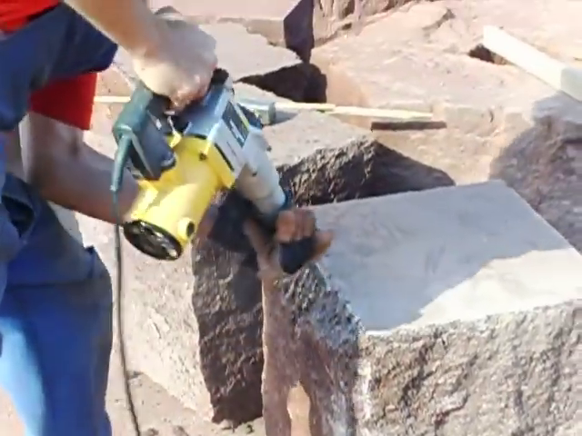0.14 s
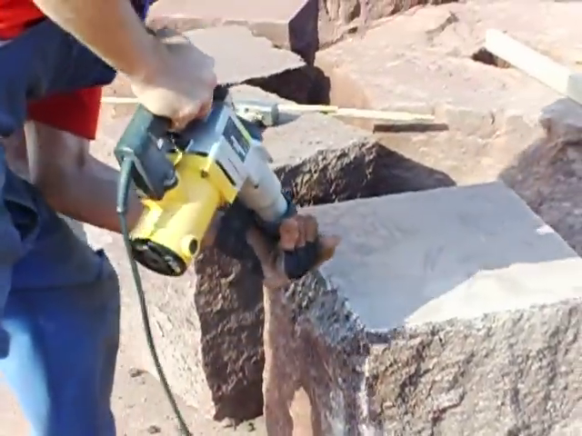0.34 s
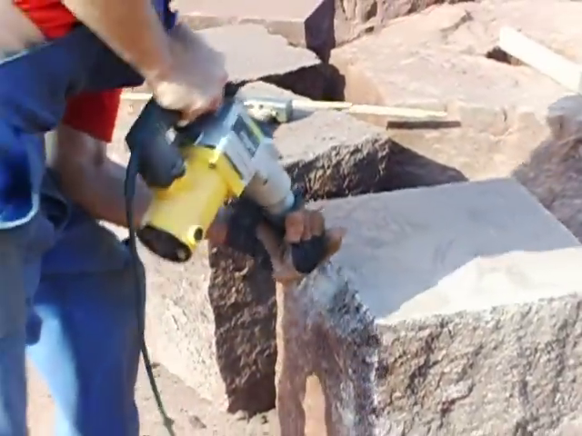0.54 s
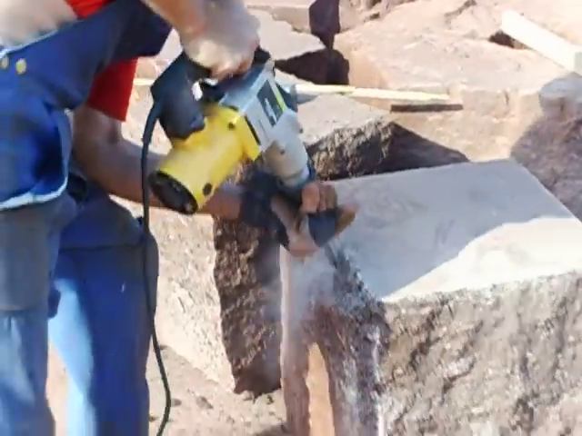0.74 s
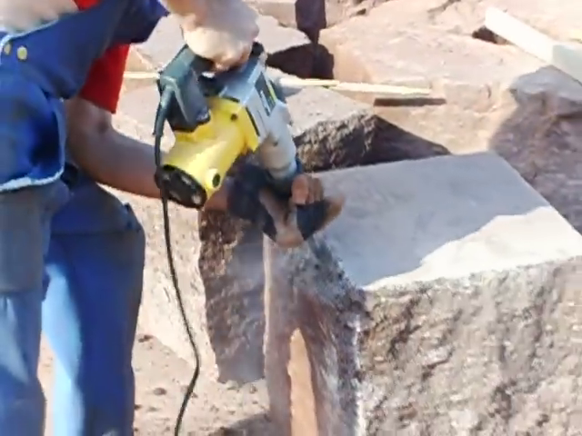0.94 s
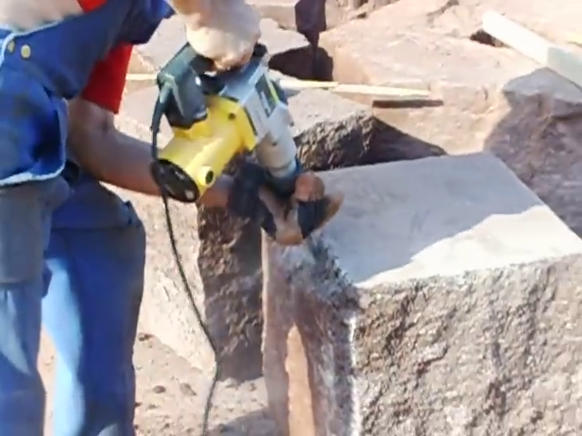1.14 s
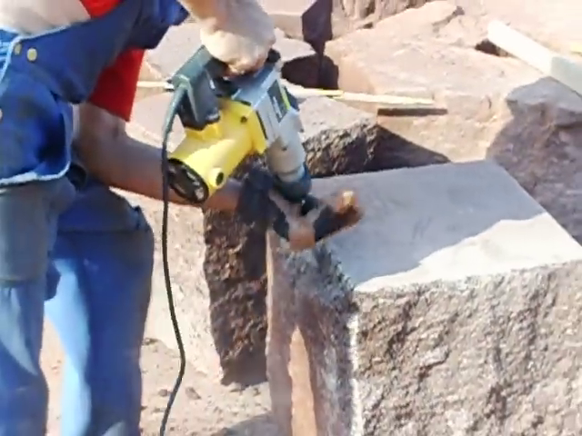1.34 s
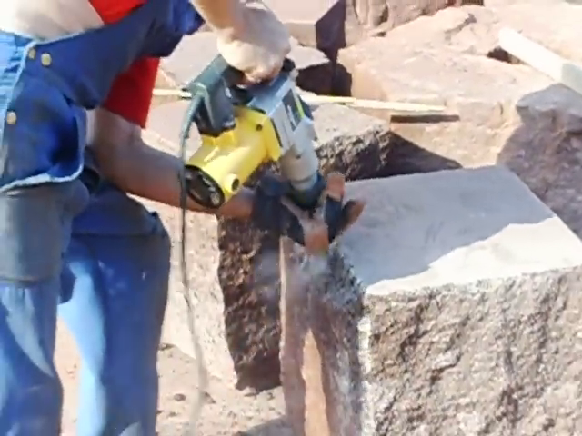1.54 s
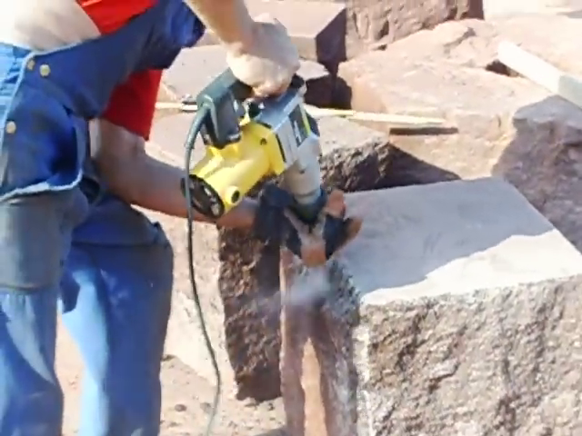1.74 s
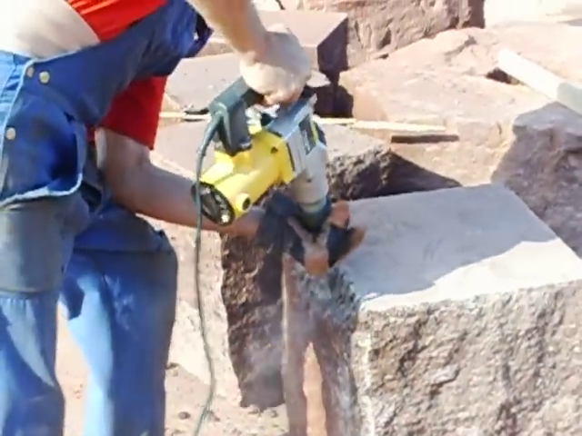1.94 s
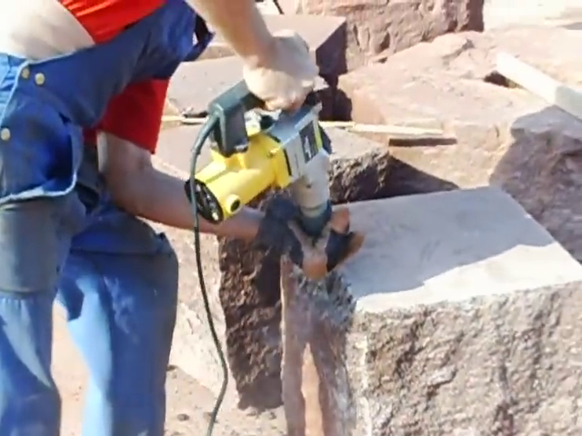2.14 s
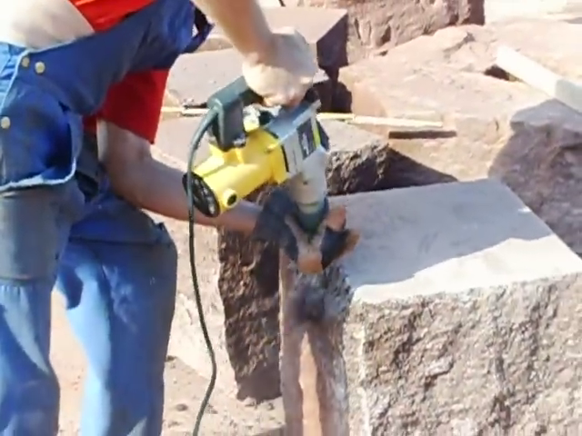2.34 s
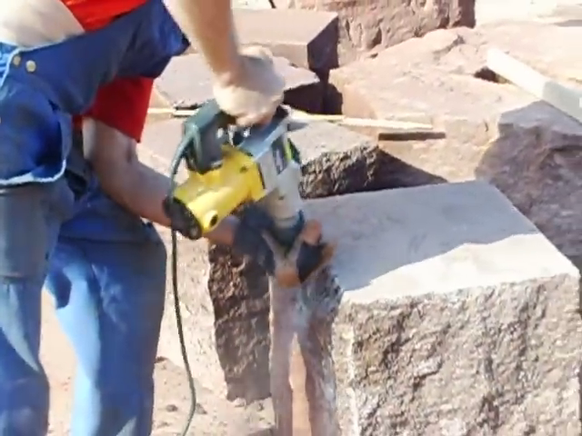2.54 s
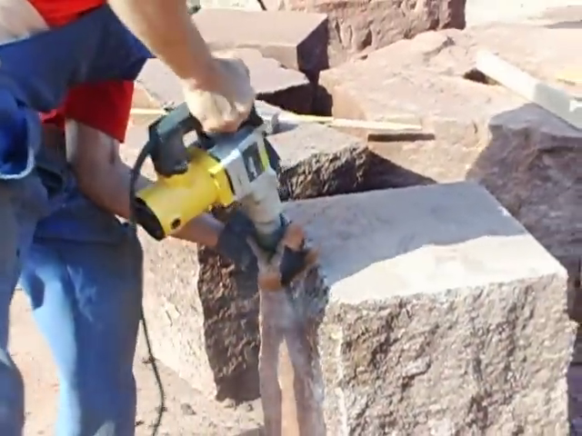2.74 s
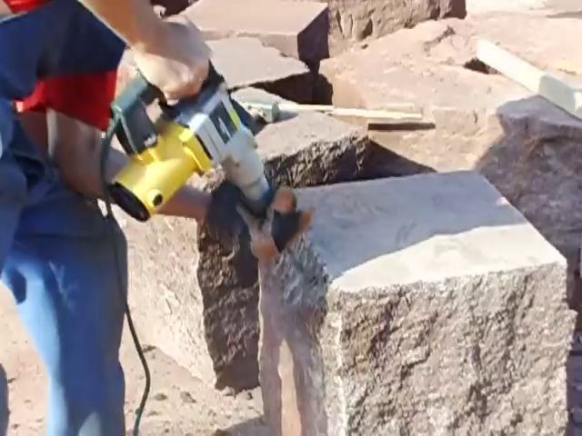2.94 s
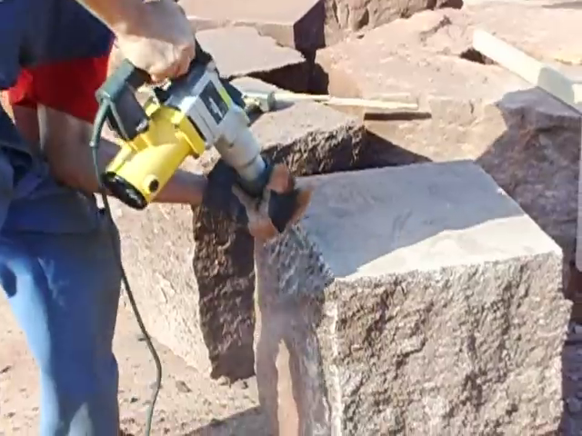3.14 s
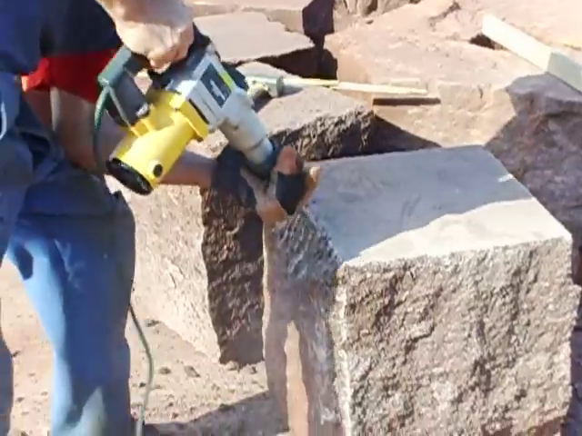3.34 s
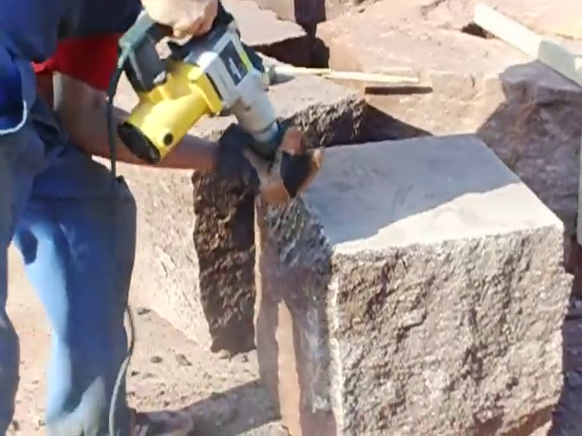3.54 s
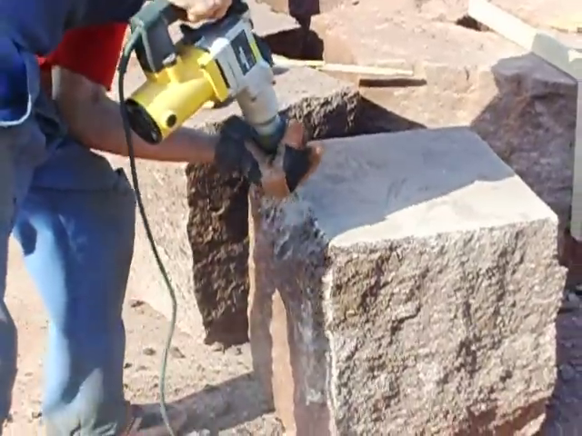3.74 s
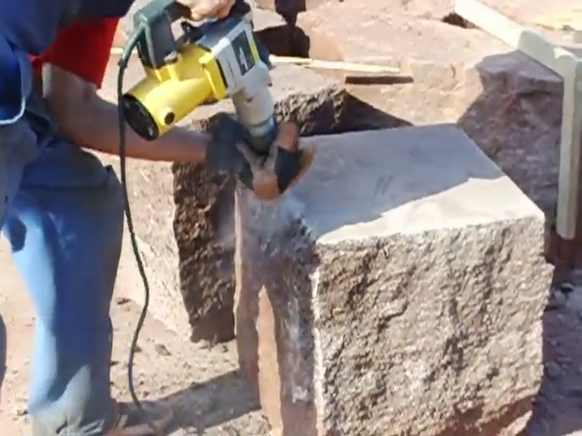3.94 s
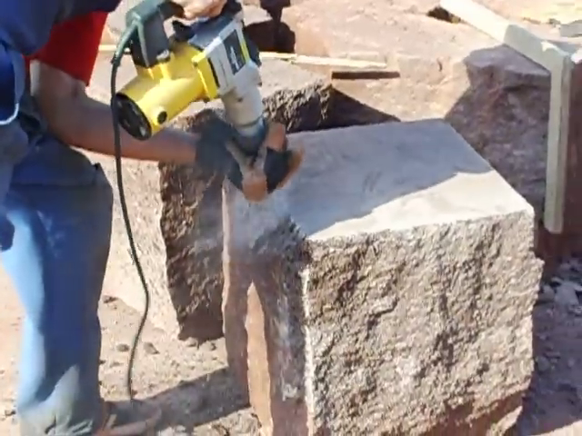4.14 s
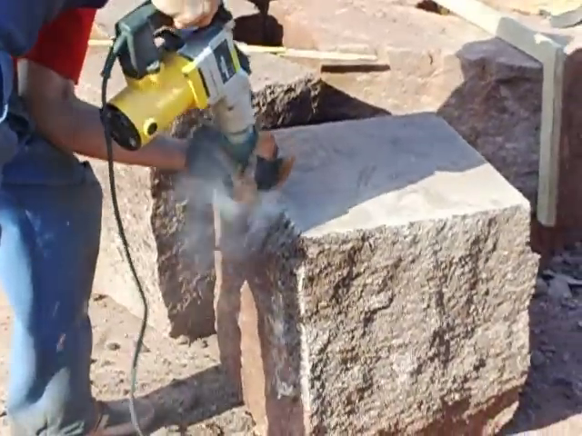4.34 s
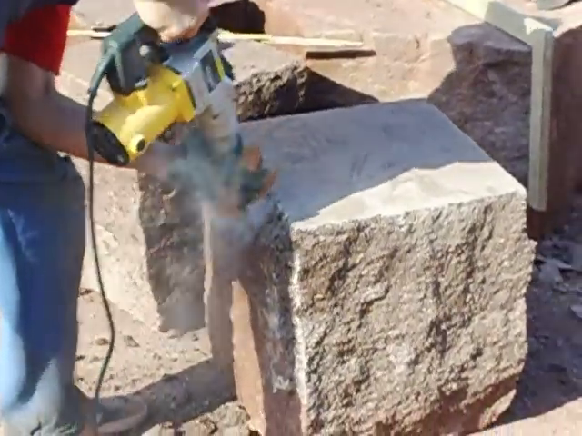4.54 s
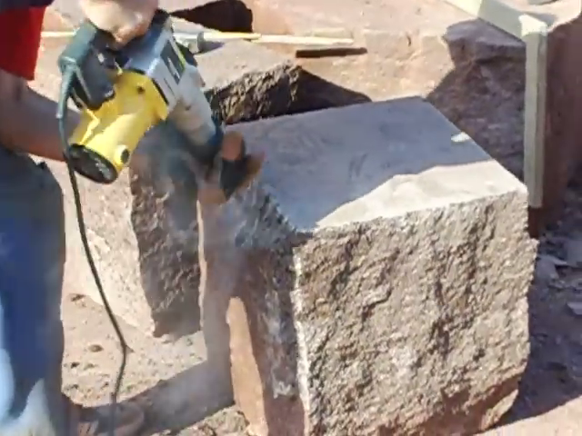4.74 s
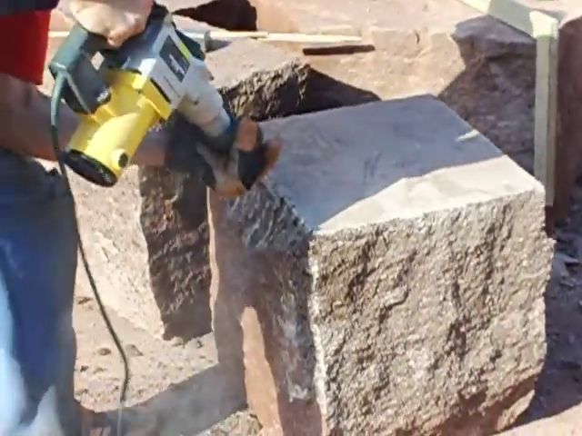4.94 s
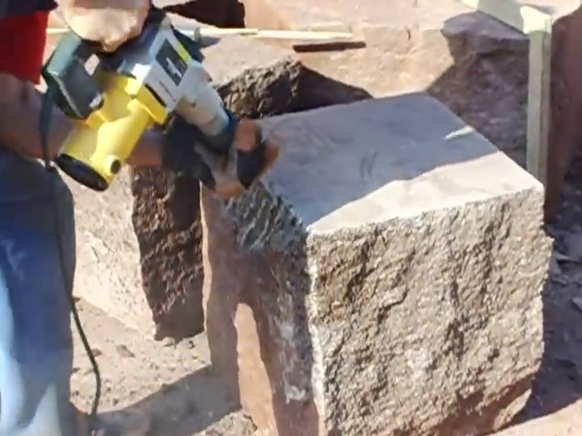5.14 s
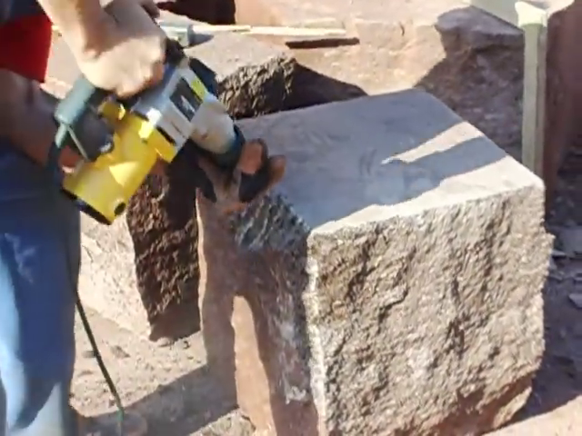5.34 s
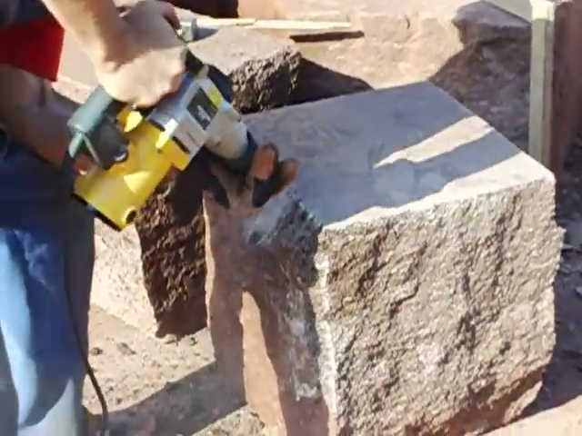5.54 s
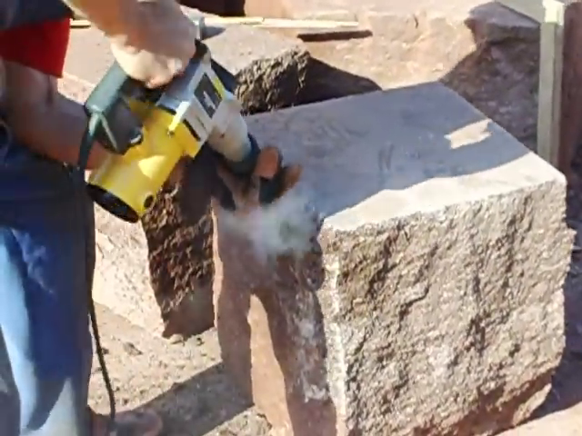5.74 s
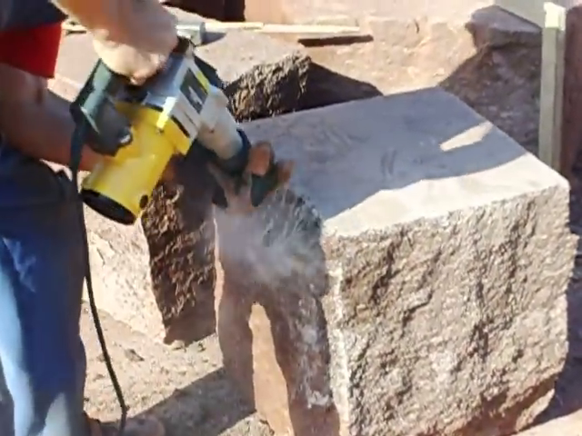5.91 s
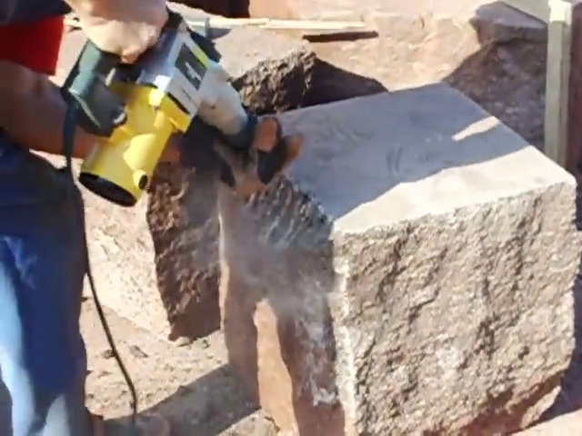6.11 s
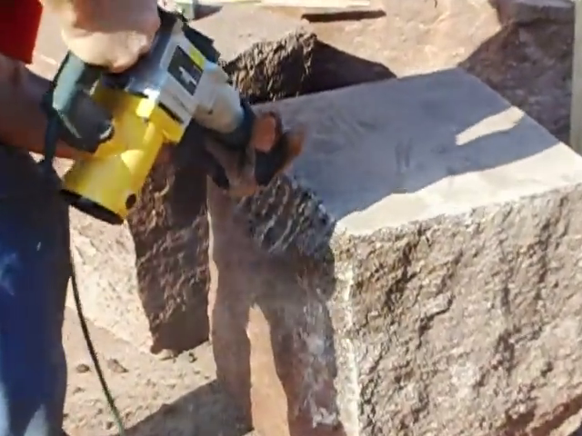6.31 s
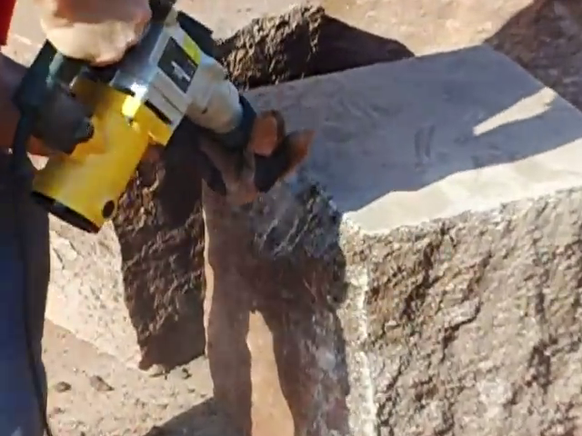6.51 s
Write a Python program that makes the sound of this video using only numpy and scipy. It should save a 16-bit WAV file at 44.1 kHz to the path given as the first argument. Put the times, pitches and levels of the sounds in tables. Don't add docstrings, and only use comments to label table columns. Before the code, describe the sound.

An electric chipping hammer coasts with loose metallic gear rattle and a motor hum, a few sharp chisel clacks, then pounds a stone block in a two-second run. After a brief dab it winds down clattering; a one-second run and a very short one follow, each with a coasting rattle. Open stone yard, faint rumble, slight dull echo, small overloaded microphone, sudden stop.

```python
import sys
import numpy as np
from scipy import signal
from scipy.fft import rfft, irfft
from scipy.io import wavfile

SR = 44100
rng = np.random.default_rng(int(sys.argv[2]) if len(sys.argv) > 2 else 0)


def volts_from_db(level):
    exponent = np.asarray(level, float) / 20
    return 10 ** exponent


def output_pcm(signal):
    pcm = np.clip(np.atleast_2d(signal).T, -1, 1) * 32767
    wavfile.write(sys.argv[1], SR, np.round(pcm).astype(np.int16))


N = 289737


def rms_one(x):
    return x / np.sqrt(np.mean(x ** 2) + 1e-20)


def bandpass(x, band_hz):
    return signal.sosfilt(signal.butter(2, band_hz, "band", fs=SR, output="sos"), x)


def drift(rate):
    knots = rng.standard_normal(4000)
    return np.interp(np.arange(N) / SR * rate, np.arange(len(knots)), knots)


def ring(x, hz, width_hz):
    r = np.exp(-np.pi * width_hz / SR)
    return rms_one(signal.lfilter([1, 0, -1], [1, -2 * r * np.cos(2 * np.pi * hz / SR), r * r], x))


def held(start, end, settle_s, fall_db_per_s):
    t = np.arange(N) / SR
    settling_db = -12 * np.clip(1 - (t - start) / settle_s, 0, 1)
    falling_db = -fall_db_per_s * np.maximum(t - end, 0)
    return volts_from_db(settling_db + falling_db) * (t >= start)


# centre in Hz, width in Hz, peak in dB.
CASING_MODES = [(785, 74, -1), (1686, 520, 2), (1810, 310, 2), (2154, 400, 3.5), (2505, 82, 5),
                (2765, 60, 5), (3483, 18, 6), (3880, 30, 2), (4200, 110, 1)]


def coloured(x, spectrum):
    hz = np.arange(2049) * SR / 4096 + 1
    points = np.array(spectrum)
    db = np.interp(np.log(hz), np.log(points[:, 0]), points[:, 1])
    for centre, width, peak_db in CASING_MODES:
        db = db + peak_db / (1 + (2 * (hz - centre) / width) ** 2)
    cepstrum = irfft(np.log(volts_from_db(db)))
    cepstrum[1:2048] *= 2
    cepstrum[2049:] = 0
    return signal.oaconvolve(x, irfft(np.exp(rfft(cepstrum))))[:N]


def yard():
    rumble = rms_one(bandpass(rng.standard_normal(N), [25, 118.4]))
    drone = ring(rng.standard_normal(N), 172.3, 5.9)
    return volts_from_db(-46.5 + 2.7 * drift(2.5)) * rumble + volts_from_db(-55) * drone


# start in seconds, crank speed the motor runs toward in turns/s (0 = coasting).
TRIGGER_MOVES = [
    (0, 0),
    (.4432, 61.063),
    (2.5426, 67.56),
    (2.7248, 0),
    (3.6, 61.04),
    (4.5277, 0),
    (5.3459, 60.445),
    (5.8084, 0),
]


def crank():
    start_turn, start_speed, full_speed = .362, 54.105, 61
    spin_up_s, coast_s = .1449, 1.7524
    t, speed, now = np.arange(N) / SR, np.zeros(N), start_speed
    following = [*TRIGGER_MOVES[1:], (N / SR, 0)]
    for (start, goal), (end, _) in zip(TRIGGER_MOVES, following):
        lag = spin_up_s if goal else coast_s
        run = goal + (now - goal) * np.exp(-np.maximum(t - start, 0) / lag)
        speed = np.where(t >= start, run, speed)
        now = goal + (now - goal) * np.exp(-(end - start) / lag)
    turns = start_turn + np.cumsum(speed) / SR
    return turns, speed - full_speed


# frequency in Hz, level in dB per Hz.
RATTLE_SPECTRUM = [(88, -58.5), (150, -31.5), (281, -24), (482, -28), (743, -9), (857, -17), (1120, -16),
                   (2660, -5.5), (3180, -5), (3740, -3), (4240, -5), (8870, -19), (11000, -27),
                   (14300, -78.5), (22000, -120)]


def rattle():
    per_s, spread_db, burst_ms = 550, 1.7, .6
    clump_db, fan_db = .4, 3.5
    sizes = volts_from_db(spread_db * np.minimum(rng.exponential(1, N), 3))
    hits = sizes * (rng.random(N) < per_s / SR)
    fade = np.exp(-1000 / (burst_ms * SR))
    flurry = np.minimum(rms_one(signal.lfilter([1], [1, -fade], hits)), 2.0)
    shake = (flurry + volts_from_db(fan_db)) * volts_from_db(clump_db * drift(60)) * rng.standard_normal(N)
    return rms_one(coloured(shake, RATTLE_SPECTRUM))


# frequency in Hz, width in Hz.
HOUSING_MODES = [(2660, 110), (3850, 150)]


def gears(fast, pressed, blow_gain):
    teeth = rattle()
    sound = volts_from_db(-14 + .1936 * fast + 3.3 * pressed) * teeth
    for mode, base_db in zip(HOUSING_MODES, (-33, -23.5)):
        level_db = base_db + .3 * fast + 7 * pressed
        sound = sound + volts_from_db(level_db + 3.3 * drift(13)) * ring(teeth, *mode)
    slack = 1 / (1 + 4 * blow_gain)
    return slack * sound


def hum(turns, fast, pressed):
    rotor_per_crank = 5.39
    level_db = -35.5 + .8 * fast - 1.5 * pressed
    return volts_from_db(level_db + .93 * drift(4.6)) * np.sin(2 * np.pi * rotor_per_crank * turns)


# time in seconds, peak in dB.
CHISEL_KNOCKS = [(.252, 0), (.3585, 2), (.4765, 1), (.481, 2), (2.9213, 2), (3.316, 1), (3.65, 2),
                 (4.7975, -2), (4.9775, 2), (5.023, 0), (5.1592, -4), (5.2607, -4), (5.9635, -2)]


def knocks():
    size, t60_ms = 600, 5
    dying = volts_from_db(-60 * np.arange(size) / (t60_ms * SR / 1000))
    train = np.zeros(N)
    for s, db in CHISEL_KNOCKS:
        at = round(s * SR)
        train[at:at + size] += volts_from_db(db) * rng.standard_normal(size) * dying
    casing_gain = np.std(coloured(rng.standard_normal(N), RATTLE_SPECTRUM))
    return coloured(train, RATTLE_SPECTRUM) / casing_gain


# start in seconds, end in seconds, settling time in seconds,
# blow level in dB, stone share in dB.
PRESSES = [
    (.5, 2.545, .05, -10, -.5),
    (2.59, 2.77, .07, -14.5, -2),
    (3.555, 4.625, .13, -10, -.5),
    (5.442, 5.828, .008, -8.5, -1.5),
]


def press(fast):
    t = np.arange(N) / SR
    pressed, blow_gain, stone_db = 0, 0, 0
    for start, end, settle_s, blow_db, share_db in PRESSES:
        hold = held(start, end, settle_s, 900)
        skid = np.clip(1 + (t - end) / .11, 0, 1)
        pressed = pressed + hold
        blow_gain = blow_gain + volts_from_db(blow_db) * hold
        stone_db = stone_db + (share_db + 4 * skid) * hold
    return np.clip(pressed, 0, 1), volts_from_db(.32 * fast) * blow_gain, volts_from_db(stone_db)


def bursts(times, shakes, t60_ms):
    size = shakes.shape[1]
    where = np.clip(times, 0, N).astype(int)[:, None] + np.arange(size)
    dying = shakes * volts_from_db(-60 * np.arange(size) / (t60_ms * SR / 1000))
    return np.bincount(where.ravel(), dying.ravel(), N + size)[:N]


# time in ms after the crank's mark, steel in dB, stone face in dB,
# block in dB, die-away t60 in ms.
BLOW_CONTACTS = [
    (-.6, -13, -16, -20, 14),
    (.8, 2.5, 1, -4, 10),
    (2.9, -7, -9, -8, 14),
    (4.4, -5, -7, -2, 12),
    (6.3, -4, 0, -5, 12),
    (8.3, -6, -8, 0, 12),
    (9.8, -6, -9, -8, 14),
    (12.5, -17, -18, -13, 14),
]
# frequency in Hz, level in dB per Hz.
BLOW_SPECTRUM = [(88, -58.5), (150, -20), (271, -18), (319, -38.5), (632, -12), (743, -6), (1100, -7.5),
                 (1580, 0.5), (3180, -0.5), (3880, -0.5), (4480, -5), (6890, -12), (11000, -22),
                 (14300, -50.5), (22000, -120)]


def blows(turns):
    memory, slip_ms = .95, .025
    scatter_ms, uneven_db = .6, 3.8
    fresh_shares = (1.6, .6, 1.0)
    whole = np.arange(1, int(turns[-1]))
    times = np.interp(whole, turns, np.arange(N))
    shape, ms_samples = (len(whole), 800), SR / 1000
    shaken = 0
    for ms, *dbs, t60_ms in BLOW_CONTACTS:
        slip, late, uneven = rng.standard_normal((3, len(whole)))
        kept = signal.lfilter([np.sqrt(1 - memory ** 2)], [1, -memory], rng.standard_normal(shape), axis=0)
        repeated = bursts(times + (ms + slip_ms * slip) * ms_samples, kept, t60_ms)
        loose = np.clip(abs(ms) / 4, .4, 1)
        crunch = rng.standard_normal(shape) * volts_from_db(loose * uneven_db * uneven)[:, None]
        fresh = bursts(times + (ms + loose * scatter_ms * late) * ms_samples, crunch, t60_ms)
        shaken = shaken + volts_from_db(dbs)[:, None] * (repeated + np.outer(fresh_shares, fresh))
    steel = signal.sosfilt(signal.butter(2, 2500, "high", fs=SR, output="sos"), shaken[0])
    face = bandpass(shaken[1], [1200, 2500])
    block = bandpass(shaken[2], [560, 1200])
    return coloured(steel, BLOW_SPECTRUM), coloured(face + block, BLOW_SPECTRUM)


def hammer(turns, blow_gain, stone_gain):
    steel, stone = blows(turns)
    return blow_gain * volts_from_db(1.5) * (steel + stone_gain * stone) / np.std(steel + stone)


# start in seconds, end in seconds, settling time in seconds, thump in dB.
LEANS = [
    (.5, 2.36, .16, -33),
    (2.65, 2.79, .08, -40),
    (3.56, 4.52, .1, -35.5),
    (5.43, 5.8, .03, -44),
]


def lean():
    return sum(volts_from_db(db) * held(start, end, settle_s, 140) for start, end, settle_s, db in LEANS)


# multiple of the crank rate, level in dB.
BODY_JOLTS = [(1, -13), (2, 0), (3, -11), (4, -4.5), (5, -9), (6, -6), (7, -14), (8, -7), (9, -8), (12, -8)]


def thump(turns, blow_gain):
    low_gain = lean()
    upper_gain = np.sqrt(blow_gain * low_gain) * volts_from_db(-13.5)
    total = 0
    for k, db in BODY_JOLTS:
        gain = low_gain if k < 3 else upper_gain
        wave = np.sin(2 * np.pi * (k * turns + rng.random()))
        total = total + gain * volts_from_db(db + .83 * drift(9.3)) * wave
    return total


def scene():
    turns, fast = crank()
    pressed, blow_gain, stone_gain = press(fast)
    tool = gears(fast, pressed, blow_gain) + hum(turns, fast, pressed)
    tool = tool + volts_from_db(-1) * knocks()
    tool = tool + hammer(turns, blow_gain, stone_gain)
    tool = tool + volts_from_db(3) * thump(turns, blow_gain)
    echo = signal.lfilter([.4], [1, -.6], np.roll(tool, round(.011 * SR)))
    return (tool + volts_from_db(-17.5) * echo + yard())[None]


def clip(x, top):
    return x / (1 + np.abs(x / top) ** 24) ** (1 / 24)


def roll_off(x):
    return signal.sosfilt(signal.butter(12, 16740, fs=SR, output="sos"), x)


def record(dry):
    peak_limit, stop_s = .71, 6.1712
    heard = signal.sosfilt(signal.butter(10, 11250, fs=SR, output="sos"), clip(dry, .64))
    shaved = np.clip(heard, -peak_limit, peak_limit)
    stopped = shaved * (np.arange(N) < stop_s * SR)
    narrow = signal.sosfilt(signal.ellip(10, .3, 70, 15800, fs=SR, output="sos"), stopped)
    return roll_off(narrow)


dry = scene()
out = record(dry)
output_pcm(out)
```